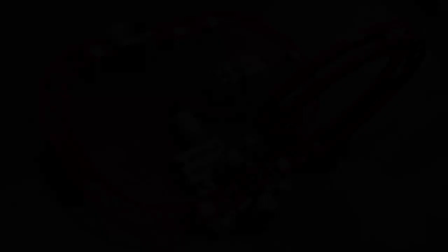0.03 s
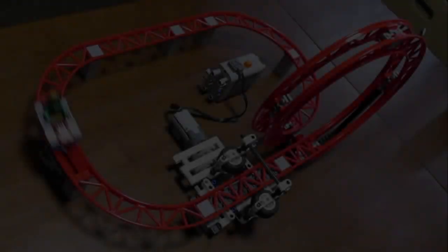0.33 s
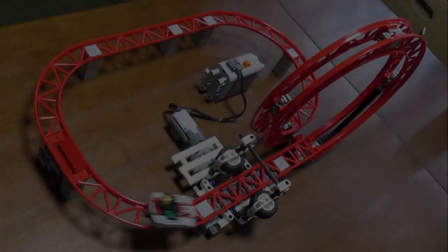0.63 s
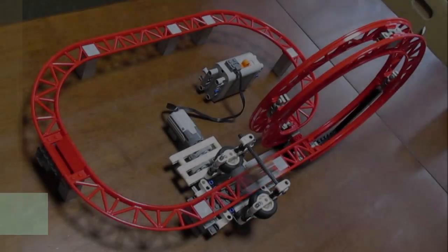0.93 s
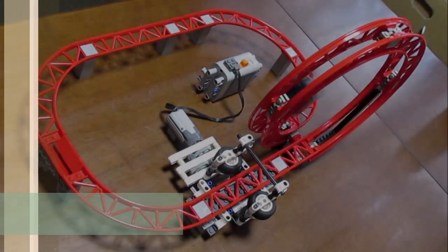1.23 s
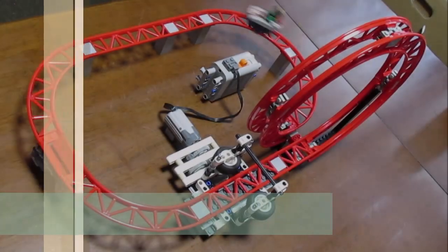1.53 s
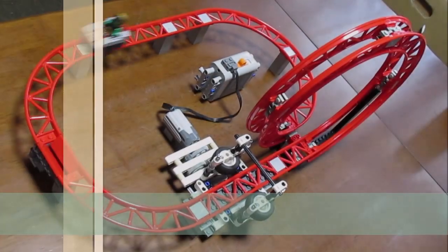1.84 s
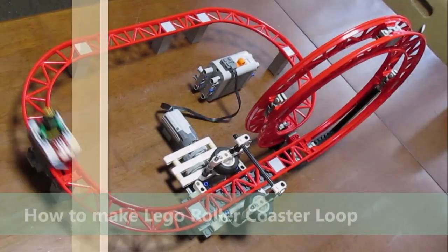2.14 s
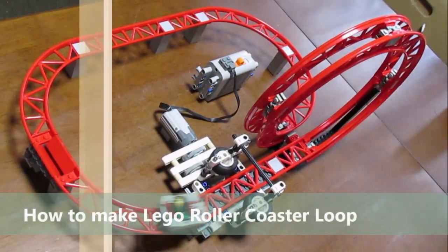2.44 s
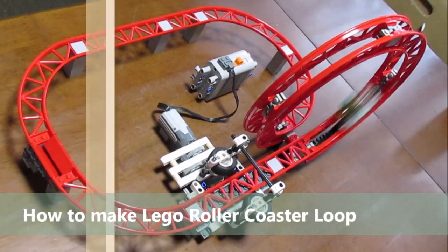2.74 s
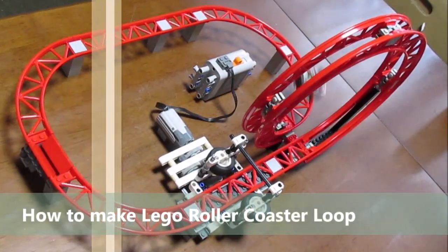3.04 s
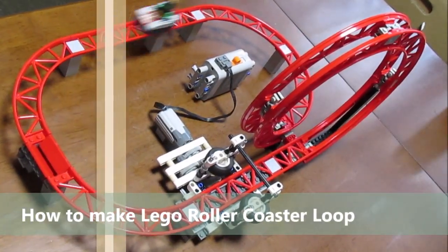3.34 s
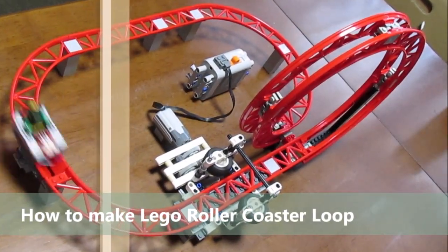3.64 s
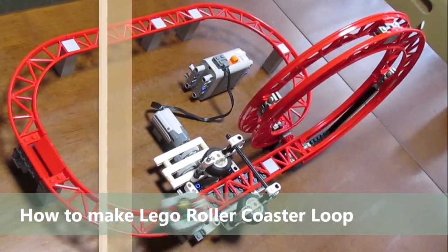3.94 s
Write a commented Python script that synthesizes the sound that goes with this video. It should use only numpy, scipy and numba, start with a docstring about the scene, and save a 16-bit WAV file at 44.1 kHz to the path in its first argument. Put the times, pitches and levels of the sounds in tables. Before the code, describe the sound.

A toy motor's plastic gears clatter steadily as a toy car clacks round a track.

```python
"""From the start, a geared toy motor spins launcher wheels with a steady plastic clatter in a small room,
while a toy car rumbles round a plastic track. At about 1 s the wheels grab the car and fling it: the
motor slows, the car clacks up into the loop and knocks on its way out, and the track booms on the table.
A close camera turns its gain down at the launch and lets it creep back. The motor picks up speed,
and at about 2.7 s the car is flung through again."""
import sys
import numpy as np
from scipy import signal
from scipy.fft import rfft, irfft
from scipy.io import wavfile
from scipy.ndimage import uniform_filter1d
from numba import njit

SR = 44100
rng = np.random.default_rng(int(sys.argv[2]) if len(sys.argv) > 2 else 0)


def output_pcm(signal):
    """Save a mono or channel-first signal as 16-bit PCM at the path in sys.argv[1].

    Samples are clipped to [-1, 1] before scaling.
    """
    pcm = np.clip(np.atleast_2d(signal).T, -1, 1) * 32767
    wavfile.write(sys.argv[1], SR, np.round(pcm).astype(np.int16))


N = 176400  # 4 seconds


# The motor's speed, which sags as the wheels grab the car. Each row: time in seconds, turns per second.
SHAFT_SPEED = [(0, 42.1), (.42, 43.2), (.8, 42.3), (.95, 42.2), (1.02, 36), (1.5, 38.5), (1.9, 42),
               (2.1, 42.3), (2.3, 42), (2.66, 42.3), (2.73, 36), (3.3, 39.3), (3.6, 40.9), (3.95, 42.2)]

def launcher():
    """The motor drives plastic gears, which clatter and faintly whine."""
    speed = curve(SHAFT_SPEED)
    clatter = plastic_frame(tooth_ticks(speed))
    return dull_under_load(clatter) + gear_whine(speed)


# How the push on the teeth rises and falls. Each entry: swings per turn of the shaft.
SWINGS_PER_TURN = [1 / 3, 1, 2, 3, 5]
# Each entry: how deep the matching swing is.
SWING_DEPTHS = [0.052, 0.011, 0.036, 0.16, 0.09]

def tooth_ticks(speed):
    """Loose gear teeth tick at random, harder at some angles of the shafts."""
    ticks_per_s, scatter_db, ring_s, snap_db = 2400, 3, 0.004, -9
    turns = np.cumsum(speed) / SR
    load = sum(depth * np.cos(2 * np.pi * (swings * turns + rng.random()))
               for swings, depth in zip(SWINGS_PER_TURN, SWING_DEPTHS))
    hits = rng.random(N) < ticks_per_s / SR
    ticks = hits * undb(scatter_db * np.clip(rng.standard_normal(N), -2, 1.7))
    flutter = undb(0.26 * wander(27))
    ticks = ticks * np.exp(load) * flutter * unit(speed) ** 0.083  # a touch louder when faster
    # Each tick is a sharp snap and a quickly fading puff of noise.
    fade = np.sqrt(signal.lfilter([1], [1, -np.exp(-2 / (ring_s * SR))], ticks ** 2 + 1e-18))
    puffs = unit(fade * noise())
    snaps = unit(ticks * np.sign(noise()))
    return unit(puffs + undb(snap_db) * snaps)


# The tone of the clatter. Each row: frequency in Hz, relative level in dB.
CLATTER_TONE = [(30, -14), (85, -18), (150, -15), (200, -13), (270, -12), (480, -10.5), (730, -6.5),
                (1350, -6.5), (1900, -9), (2450, -9), (3100, -2.5), (4200, -3), (5400, 1.14), (6400, -1),
                (7400, -2), (9500, -2.5), (10500, -9), (11400, -9.5), (12500, -2), (15500, -7.5)]
# Where the launcher's frame rings. Each row: frequency in Hz, width in Hz, boost in dB.
FRAME_RESONANCES = [(262, 38, 12), (357.5, 15.7, 12.5), (455, 18, 6), (490, 20, 1.5), (568, 46, 11),
                    (650, 15, 7), (735.4, 44, 10.5), (833, 19, 2.5), (980, 45, -1.5), (1056, 28, 7.5),
                    (1360, 39, -6.5), (1660, 40, 4), (1890, 30, 7.5), (2060, 30, 4), (3370, 91, 2.5),
                    (3640, 120, 1), (4610, 210, 1), (5420, 150, 2.5), (6240, 320, 3), (7470, 220, 2),
                    (9030, 130, -0.5), (9600, 320, 1.5)]
# How the clatter leans to one side. Each row: frequency in Hz, left over right in dB.
CLATTER_BALANCE = [(300, 0), (2500, -1), (5500, 1), (7300, -0.5), (9000, 4.5), (11000, 2.5), (15000, 1)]

def plastic_frame(ticks):
    """The launcher's frame rings with the ticks and makes them sound like plastic."""
    level_db = -26
    clatter = spread(colour(ticks, response(CLATTER_TONE) * peaks(FRAME_RESONANCES))) * undb(level_db)
    lean = np.sqrt(response(CLATTER_BALANCE))
    return irfft(rfft(clatter) * np.array([lean, 1 / lean]), N)


# The clatter's treble, which dips at each launch. Each row: time in seconds, gain in dB.
TREBLE_GAIN = [(0, -0.5), (.955, -2), (.985, -12), (1.15, -4), (1.35, -3.5), (1.6, -2), (2.675, -1),
               (2.70, -20), (2.87, -5), (2.97, -2.5), (4, -1)]

def dull_under_load(clatter):
    """While the motor labours, the teeth stay pressed together and tick less brightly."""
    treble = irfft(rfft(clatter) * (1 - low_pass(freqs(), cutoff_hz=8500)), N)
    return clatter + (undb(curve(TREBLE_GAIN)) - 1) * treble


# The gears that whine. Each entry: number of teeth.
GEAR_TEETH = [8, 14, 40, 47]
# Each entry: level of the matching gear's whine in dB.
WHINE_LEVELS = [-54, -54, -50, -55]

def gear_whine(speed):
    """Each gear sings at the rate its teeth meet, lower and softer as the motor slows."""
    whine = np.zeros(N)
    for teeth, db in zip(GEAR_TEETH, WHINE_LEVELS):
        cycles = teeth * np.cumsum(speed * (1 + 0.005 * wander(38.8))) / SR
        flutter = undb(2.5 * wander(90))
        whine += undb(db) * unit(np.sin(2 * np.pi * cycles) * flutter * speed ** 5)
    return whine


# The wheels hitting the rails. Each row: start in seconds, level in dB, fade time in seconds.
RAIL_HITS = [(.933, -21, 0.0097), (0.939, -18, 0.0045), (0.949, -24, 0.009), (.957, -18, 0.0048),
             (.9645, -12, 0.0058), (1.0091, -5, 0.0035), (1.0271, -12, 0.0096), (1.082, -13.5, 0.003),
             (1.294, -27, 0.016), (1.3573, -9.5, 0.0012), (1.37, -16.5, 0.0035), (1.421, -27, 0.0096),
             (2.655, -18, 0.003), (2.669, -16.5, 0.0069), (2.6726, -14, 0.0074), (2.683, -8.5, 0.0039),
             (2.7246, -11.5, 0.0029), (2.739, -4, 0.0028), (2.777, -19, 0.014), (2.961, -23, .012),
             (3.018, -13, 0.0034), (3.028, -13.5, .004), (3.041, -14.5, 0.0024), (3.062, -21.5, 0.011)]
# The tone of a clack. Each row: frequency in Hz, relative level in dB.
CLACK_TONE = [(150, -18.5), (900, -11.5), (1700, -5), (2600, -8), (3400, -10), (4300, -5), (5900, 0.5),
              (6800, -0.5), (8000, 1), (9500, -4.5), (11000, -14.5), (15500, -17)]
# Where the car's body and wheels ring. Each row: frequency in Hz, width in Hz, boost in dB.
CAR_RESONANCES = [(3390, 250, 12), (4640, 230, 8), (5690, 400, 7.5), (6390, 250, 5.5), (6700, 330, 6.5)]

def wheel_clacks():
    """Hard plastic wheels strike the rails, each time with a short, bright burst of noise."""
    attack_s, hold_s = 0.0012, 0.00024
    t, power = np.arange(N) / SR, np.zeros(N)
    for start, db, fade_s in RAIL_HITS:
        age = np.clip(t - start, 0, 0.2)
        rise = np.minimum(age / attack_s, 1)
        fall = np.exp(-np.maximum(age - hold_s, 0) / fade_s)
        power += (undb(db) * rise * fall) ** 2
    return spread(colour(np.sqrt(power) * noise(), response(CLACK_TONE) * peaks(CAR_RESONANCES)))


# Blows that shake the whole track. Each row: start in seconds, level in dB, then boosts in dB
# for the deep notes, the loop's notes and the table's boom.
TRACK_BLOWS = [(0.9561, -15.5, -4.5, -3, 0.5), (.964, -19, 5, 2, 1), (0.975, -20, -9, 6, -8),
               (1.0318, -23.5, 0, 12, 2.5), (1.038, -26.5, 12, -2, 3), (1.304, -35, -2, 0, -4),
               (1.37, -31.5, 3.5, -3, 9), (1.414, -25.5, -10.5, 0, 6), (2.6726, -18.5, 4, 0.5, -9),
               (2.683, -20, -1, -4, -3), (2.689, -19.5, -6, 1, -10), (2.749, -30.5, 7, 12.5, 0),
               (2.961, -37, 7, -5, -2), (3.029, -31, -1, -7, -7), (3.073, -28.5, -6, 13, 0),
               (3.119, -27, -14, -6, -4)]
# The notes the track rings at. Each row: frequency in Hz, relative level in dB, seconds to fade by 60 dB.
TRACK_NOTES = [(124, -23, 0.19), (153, -9, 0.1), (262, -6.5, 0.22), (350.7, -2, 0.1), (432, -15, 0.2),
               (578, 0, 0.046), (636, -8, 0.053), (843, -16, 0.28), (1028, -7.5, 0.079), (1117, -6, 0.084),
               (1352, 0, 0.033), (1522, 2, 0.021), (1642, -8.5, 0.085), (1890, 0.5, 0.017)]
# The tone of the table's thud. Each row: frequency in Hz, relative level in dB.
THUD_TONE = [(60, -55), (150, 1.5), (350, -4), (800, 2.5), (1700, 0), (2300, -8), (5000, -3), (15000, -11)]

def track_knocks():
    """The car's blows set the track ringing over a dull thud of the table."""
    deep_hz, loop_hz, loop_width_hz, boom_hz = 596, 1400, 640, 205
    push_s, thud_fade_s = 0.0007, 0.0086
    age = np.arange(SR // 3) / SR
    hz, note_db, ring_s = np.array(TRACK_NOTES).T[:, :, None]
    rise = np.minimum(age / (push_s + 1 / hz), 1)  # low notes take longer to build
    thud_bass = low_pass(np.fft.rfftfreq(len(age), 1 / SR), boom_hz)
    rings, thuds = np.zeros(N), np.zeros((2, N))
    for start, db, deep_db, loop_db, boom_db in TRACK_BLOWS:
        span = slice(int(start * SR), int(start * SR) + len(age))
        detuned_hz = hz * (1 + 0.009 * rng.standard_normal(hz.shape))
        waves = np.sin(2 * np.pi * (detuned_hz * age + rng.random(hz.shape)))
        boost_db = deep_db / (1 + (hz / deep_hz) ** 2)
        boost_db += loop_db * bump(hz, loop_hz, loop_width_hz)
        boost_db += boom_db * low_pass(hz, boom_hz)
        level = undb(db + note_db + boost_db - 60 * age / ring_s)
        rings[span] += (level * waves * rise).sum(axis=0)
        burst = rng.standard_normal((2, len(age)))
        shake = irfft(rfft(burst) * undb(boom_db * thud_bass), len(age))
        thuds[:, span] += shake * undb(db) * np.exp(-age / thud_fade_s)
    return rings + spread(colour(thuds, response(THUD_TONE)))


# How loudly the car rolls. Each row: time in seconds, level in dB.
RUMBLE_LEVEL = [(0, -39), (.7, -41.5), (.92, -36), (1.04, -24), (1.17, -39.5), (1.33, -35), (1.45, -33.5),
                (1.6, -41.5), (2.5, -42), (2.64, -36.5), (2.76, -22.5), (2.88, -37), (3.06, -28.5),
                (3.2, -38.5), (4, -38.5)]
# The tone of the rumble. Each row: frequency in Hz, relative level in dB.
RUMBLE_TONE = [(40, -13), (90, -33), (118, 0.5), (135, -6), (158, 3.5), (200, -2), (260, -3.5), (350, 5),
               (470, -5.5), (800, -2.5), (1500, -8.5), (3000, -6.5), (12000, -12)]

def wheel_rumble():
    """The wheels rumble on the track, most where the loop presses the car down."""
    rough_noise = noise() * undb(2.7 * wander(63))
    return spread(colour(rough_noise, response(RUMBLE_TONE))) * undb(curve(RUMBLE_LEVEL))


# The car running over rail joints. Each row: start in seconds, length in seconds, level in dB.
RAIL_JOINTS = [(.75, .1, -48), (1.285, .12, -39), (2.945, .16, -37.5)]

def joint_drone():
    """Over the rail joints the wheels set one low note of the track humming."""
    pitch_hz = 156
    t, swell = np.arange(N) / SR, np.zeros(N)
    for start, length, db in RAIL_JOINTS:
        progress = np.clip((t - start) / length, 0, 1)
        swell += undb(db) * np.sqrt(np.abs(np.sin(np.pi * progress)))
    cycles = np.cumsum(pitch_hz * (1 + 0.035 * wander(41))) / SR
    flutter = undb(2 * wander(34))
    return swell * unit(np.sin(2 * np.pi * cycles) * flutter)


def room(x, echo_db):
    """The small room adds a short wash of echoes, different at each ear."""
    delay_s, ring_s = 0.004, 0.17
    age = np.arange(SR // 2) / SR
    tail = rng.standard_normal((2, len(age))) * undb(-60 * age / ring_s) * (age > delay_s)
    tail /= np.sqrt(np.sum(tail ** 2, axis=1, keepdims=True))
    return x + undb(echo_db) * signal.fftconvolve(x, tail, axes=1)[:, :N]


# How wide the sound is. Each row: frequency in Hz, level of the sides against the middle in dB.
STEREO_WIDTH = [(60, -10), (100, 8.5), (140, -5), (250, -7.5), (700, -9.5), (2400, -9), (4400, -7),
                (8100, -5.5), (15000, -4)]

def spread(pair):
    """Two unrelated signals become the middle and the sides of a stereo sound."""
    side = irfft(rfft(pair[1]) * response(STEREO_WIDTH), N)
    return np.array([pair[0] + side, pair[0] - side])


def undb(db):
    """Turn decibels into a gain."""
    return 10 ** (np.asarray(db) / 20)


def unit(x):
    """Scale a signal to an average power of 1."""
    return x / np.sqrt(np.mean(x ** 2))


def noise():
    """Two channels of white noise."""
    return rng.standard_normal((2, N))


def wander(rate_hz):
    """A smooth random wobble of about 1 in size; a higher rate wobbles faster."""
    window = int(SR / rate_hz)
    smoothed = uniform_filter1d(rng.standard_normal(N), window, mode="wrap")
    return unit(uniform_filter1d(smoothed, window, mode="wrap"))


def curve(points):
    """Join (seconds, value) points with straight lines."""
    return np.interp(np.arange(N) / SR, *np.array(points).T)


def freqs():
    """The frequencies of the spectrum in Hz."""
    return np.arange(N // 2 + 1) * SR / N


def response(points):
    """Gain at every frequency from (Hz, dB) points."""
    hz, db = np.array(points).T
    return undb(np.interp(np.log(freqs() + 1), np.log(hz), db))


def low_pass(hz, cutoff_hz):
    """Near 1 below the cutoff, falling steeply to 0 above it."""
    return 1 / (1 + (hz / cutoff_hz) ** 8)


def bump(hz, centre_hz, width_hz):
    """1 at the centre, falling away on both sides."""
    return 1 / (1 + (2 * (hz - centre_hz) / width_hz) ** 2)


def peaks(resonances):
    """Gain at every frequency from (Hz, width in Hz, dB) resonances."""
    return undb(sum(db * bump(freqs(), hz, width) for hz, width, db in resonances))


def colour(x, gain):
    """Shape a sound's tone; white noise keeps its power."""
    cepstrum = irfft(np.log(unit(gain)), N)
    # Folding onto the first half makes the filter ring after a hit, never before it.
    cepstrum[1:N // 2] *= 2
    cepstrum[N // 2 + 1:] = 0
    return irfft(rfft(x) * np.exp(rfft(cepstrum)), N)


@njit
def follow(levels, attack, release, rest):
    """Track a level, rising at the attack rate and sinking at the release rate, never below rest."""
    out, held = np.empty(len(levels)), rest
    for i in range(len(levels)):
        goal = max(levels[i], rest)
        held += (goal - held) * (attack if goal > held else release)
        out[i] = held
    return out


def scene():
    """The launcher runs throughout while the car makes its laps."""
    running = launcher() + wheel_rumble() + joint_drone()
    return running + room(wheel_clacks(), echo_db=-6) + room(track_knocks(), echo_db=-9)


def record(dry):
    """The camera turns loud blows down, then cuts a narrow band of treble and the very top."""
    limit, attack_s, release_s = float(undb(-20)), 0.013, 0.11
    notch_hz, notch_width_hz, top_hz = 7890, 200, 15800
    start_s, fade_in_s = 0.067, 0.0055
    power = uniform_filter1d(np.mean(dry ** 2, axis=0), size=88)  # averaged over 2 ms
    gain = limit / follow(np.sqrt(np.abs(power)), 1 / (attack_s * SR), 1 / (release_s * SR), limit)
    notch = signal.iirnotch(notch_hz, notch_hz / notch_width_hz, fs=SR)
    fade_in = np.clip((np.arange(N) / SR - start_s) / fade_in_s, 0, 1)
    top_cut = signal.ellip(12, 0.2, 80, top_hz, fs=SR, output="sos")
    return signal.sosfilt(top_cut, signal.lfilter(*notch, dry * gain) * fade_in)


dry = scene()
out = record(dry)
output_pcm(out)
```